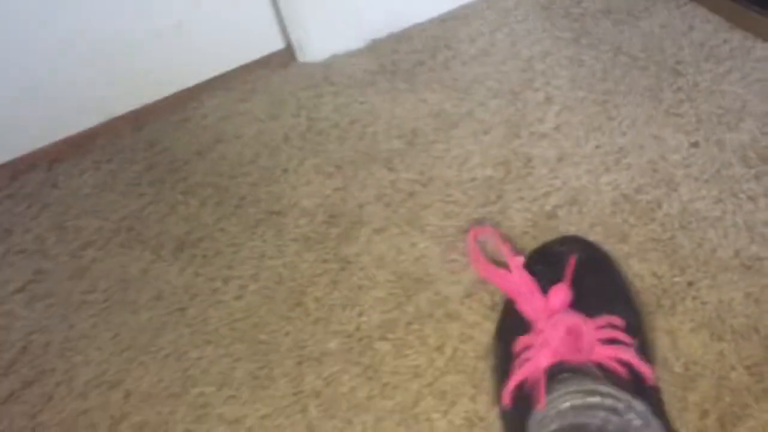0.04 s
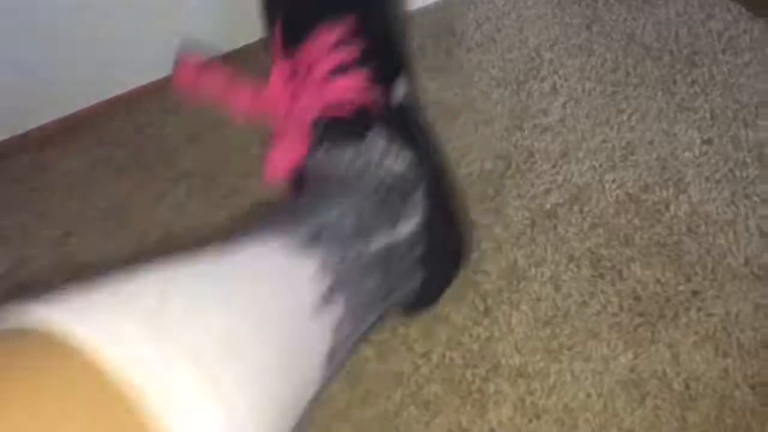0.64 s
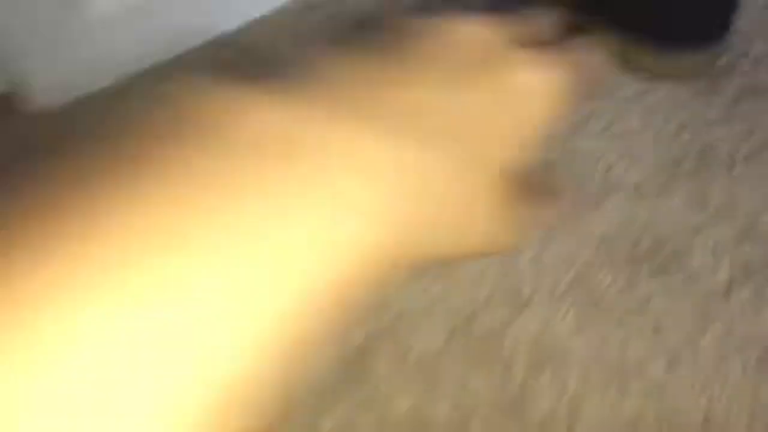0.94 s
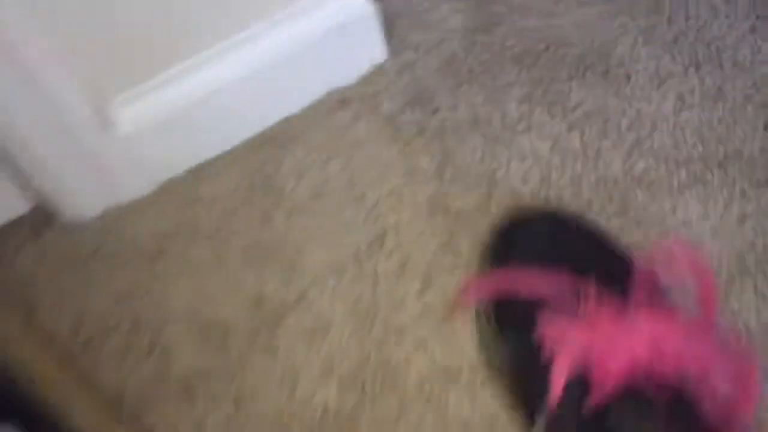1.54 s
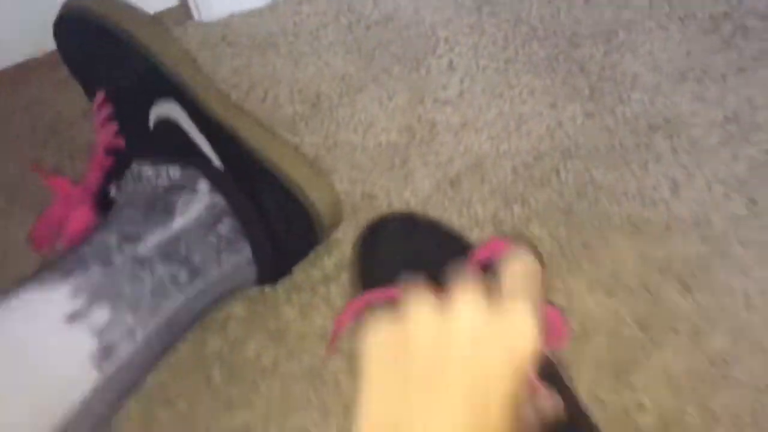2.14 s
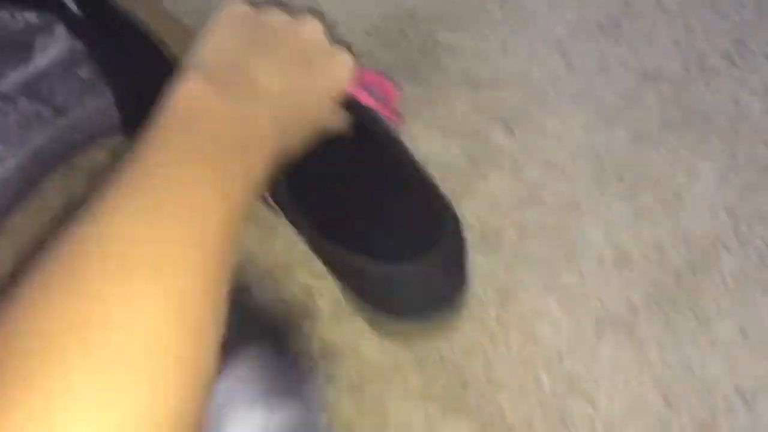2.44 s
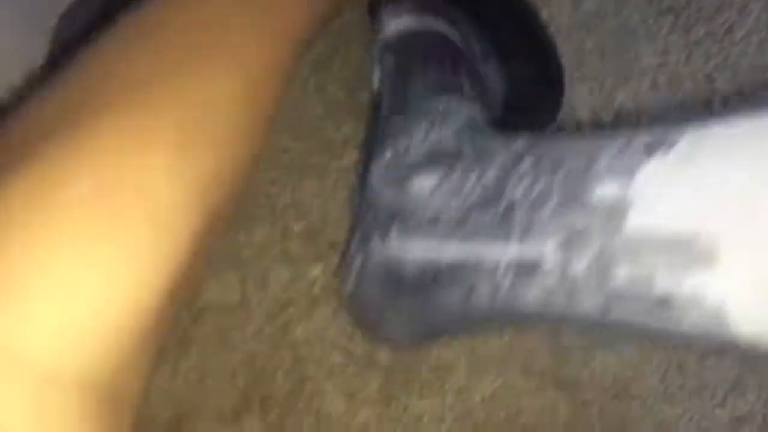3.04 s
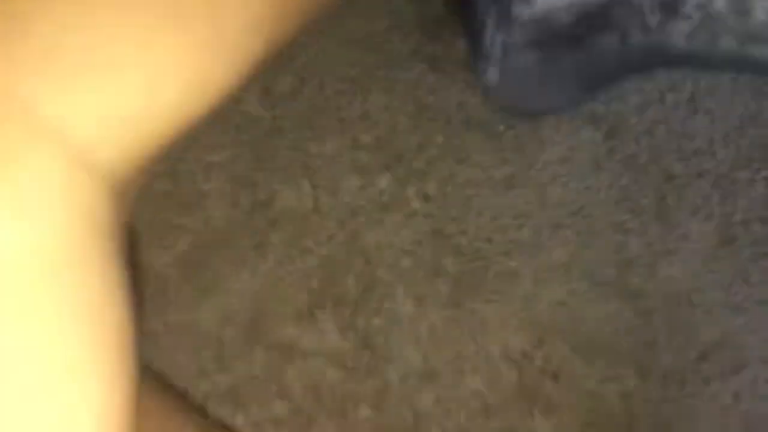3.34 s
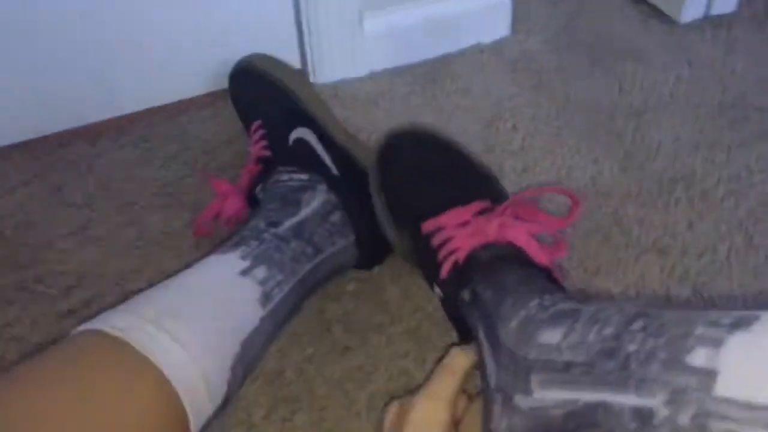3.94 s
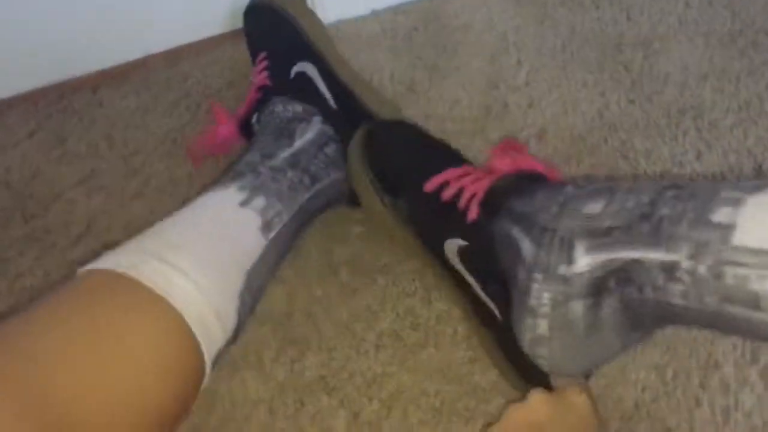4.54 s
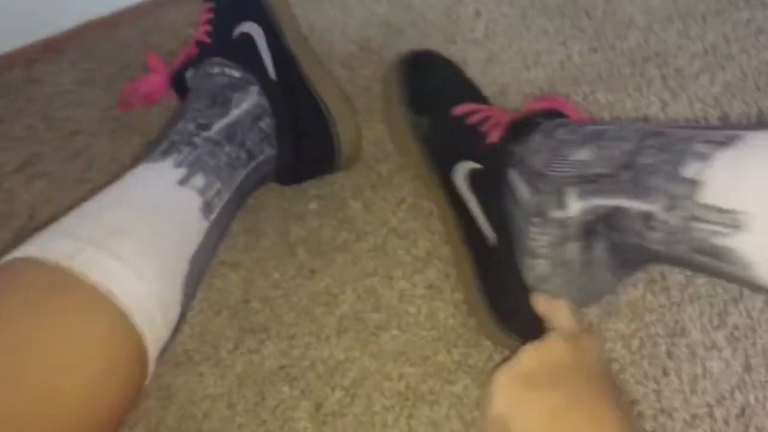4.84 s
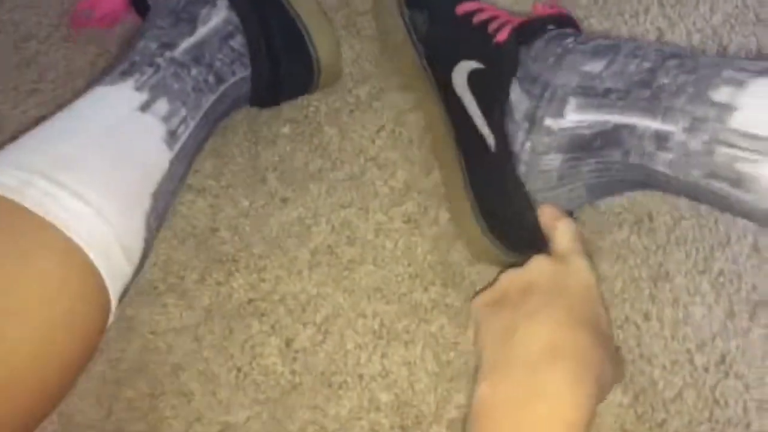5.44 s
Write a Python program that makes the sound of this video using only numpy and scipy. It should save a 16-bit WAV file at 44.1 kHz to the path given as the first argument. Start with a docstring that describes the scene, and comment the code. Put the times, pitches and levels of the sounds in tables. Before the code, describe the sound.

A heel thumps dully on carpet, then a socked foot is worked into a sneaker with soft, close scuffs and clicks.

```python
"""A faint squeak and a rub as a foot settles in a sneaker, then its heel lands with a dull thump.
Someone sits on the carpet of a quiet room, close to the microphone, pulling on shoes.
The second shoe is dragged over the pile and a socked foot is worked into it: fibres catch
and let go, lace tips and canvas tick, foot and shoe knock softly on the floor.
The carpet swallows the echoes; only a low rumble and a thin hiss lie behind."""
import sys
import numpy as np
from scipy import signal
from scipy.fft import rfft, irfft
from scipy.io import wavfile
from scipy.ndimage import uniform_filter1d

SR = 44100
rng = np.random.default_rng(int(sys.argv[2]) if len(sys.argv) > 2 else 0)


def to_wav(sig):
    """Store sig (one row per channel, or 1-D mono) as 16-bit WAV at the path in sys.argv[1].

    Samples outside -1..1 are clipped; the rate is SR.
    """
    pcm = np.clip(np.atleast_2d(sig), -1, 1) * 32767
    pcm = np.round(pcm).astype(np.int16)
    wavfile.write(sys.argv[1], SR, pcm.T)  # frames by channels


N = 250461

# Strokes of foot and shoe, each with its own loudness and brightness. The first foot settles and lifts;
# the second shoe is dragged from 1.1 s, held open from 2.7 s and pulled on from 4 s.
# (time at full speed [s], hold [s], rise [s], fall [s], relative levels of pile, cloth and hollow [dB],
#  tilt of pile and hollow [dB/octave], tilt of cloth [dB/octave])
STROKES = [ (0.0, 0.0058, .01, 0.03, -51.5, -56.5, -60, 2, -1),
           (0.04, 0.065, .05, 0.27, -65.5, -77.5, -66, 3, -1),
           (0.302, 0.037, 0.052, 0.058, -62, -71.5, -57, 4.5, -4),
           (0.49, 0.028, 0.027, 0.084, -69.5, -68.5, -80, 1, -2),
           (.667, .013, 0.0058, 0.017, -58.5, -61.5, -65, 0, -1.5),
           (0.783, 0.15, 0.3, 0.29, -67.5, -74.5, -71, 2.5, -1.5),
           (1.1, 0.014, 0.0097, 0.094, -63, -75.5, -69, -1.5, -6),
           (1.191, 0.01, 0.0086, .016, -54.5, -64.5, -49.5, 0, 0),
           (1.222, 0.007, 0.0092, 0.027, -55.5, -68.5, -68, -1.5, -7),
           (1.319, 0.011, 0.041, 0.028, -54, -67, -60, -2, -3.5),
           (1.388, 0.014, 0.023, .018, -55.5, -71, -58, -1, -4.5),
           (1.486, 0.22, 0.012, 0.064, -53.5, -68.5, -61, -3, -6.5),
           (1.748, 0.059, .06, 0.042, -50.5, -67.5, -58, -0.5, -3),
           (1.79, .04, 0.037, .025, -63, -64, -72, 2, 5),
           (1.871, 0.015, .012, 0.0077, -68.5, -60.5, -69, -3, 3),
           (1.977, 0.025, .014, 0.058, -64.5, -67, -57.5, -3.5, -3.5),
           (2.139, 0.0072, 0.015, 0.021, -56, -73, -55, -3.5, -6),
           (2.268, .07, 0.14, 0.15, -52, -62.5, -54.5, 1.5, -5.5),
           (2.497, 0.016, .03, 0.03, -75, -69, -54.5, 1.5, -4.5),
           (2.727, 0.039, 0.022, 0.0096, -66.5, -66, -70.5, 0, 0.5),
           (2.792, 0.016, 0.0085, 0.025, -66, -57.5, -75, -3, 1),
           (2.868, 0.017, .025, 0.013, -68, -61, -62, -1, 1),
           (3.008, 0.042, 0.14, .03, -72, -65, -67, -5, 0.5),
           (3.087, 0.042, 0.027, 0.031, -64.5, -58.5, -58.5, 1, -1),
           (3.188, 0.052, .03, .05, -72, -62, -62, -1, -2),
           (3.271, 0.048, .07, 0.041, -61.5, -57, -54.5, 6.5, -1),
           (3.368, 0.1, .03, 0.17, -73, -70, -80, -3.5, -0.5),
           (3.564, 0.035, 0.021, 0.045, -71, -63, -58, 4, .5),
           (3.662, 0.0058, .004, 0.021, -62.5, -64, -56, -3, -4),
           (3.709, 0.014, 0.057, 0.055, -71, -63.5, -71, -3, 2),
           (3.901, 0.011, 0.074, 0.029, -69, -69.5, -63, -2, 4),
           (4.045, 0.03, .01, .02, -90, -69.5, -79, -4, 5),
           (4.116, 0.031, .02, 0.041, -75, -66, -63.5, -5, -2),
           (4.193, 0.081, .06, 0.089, -65.5, -59, -67, -2, 2.5),
           (4.307, .015, 0.027, .015, -59, -71, -55.5, 0, 0),
           (4.409, 0.026, 0.066, 0.02, -63.5, -56, -53, 2.5, -2),
           (4.485, 0.024, 0.036, 0.1, -63.5, -63, -55.5, 4, -2),
           (4.62, 0.052, 0.052, .05, -60.5, -66, -67, 3, -4),
           (4.732, 0.028, 0.046, 0.05, -55.5, -54.5, -47.5, 3, -1),
           (4.898, .12, 0.057, .05, -70.5, -75, -76, -2, -1),
           (5.068, 0.066, 0.038, 0.063, -68, -65, -56, -4, -2),
           (5.212, 0.033, 0.033, .05, -71, -78, -65, -3, -9),
           (5.355, 0.016, 0.036, 0.03, -57, -75, -60, 1.5, -6),
           (5.487, 0.045, 0.078, 0.049, -53, -53, -48, 1, -2),
           (5.651, .01, .03, .03, -66.5, -69.5, -73, -2, 2), ]


def rubbing():
    """Close up, the sole rubs the carpet pile, cloth rubs canvas, and both stir the shoe's hollow."""
    # Colours of the three sounds: (frequency [Hz], relative level [dB])
    pile_colour = [(100, -26.5), (200, -0.5), (330, -13.5), (520, 3), (680, 0.5), (950, -0.5), (1250, -0.5),
                   (1800, -6), (2300, -11), (3000, -15.5), (4200, -15), (5200, -29), (9000, -33),
                   (16000, -54)]
    canvas_colour = [(500, -9.5), (1500, -3.5), (2300, 2.5), (2900, -1.5), (4000, 2), (4950, -1), (5600, 2),
                     (6600, 1), (7600, -1.5), (9600, -0.5), (10400, -7.5), (11500, -3), (14000, -7.5),
                     (16000, -7.5)]
    hollow_colour = [(100, -31), (190, -13), (290, -2.5), (400, 0), (500, -4.5), (620, -11), (900, -17),
                     (2000, -43)]
    pile_db, cloth_db, hollow_db, pile_tilt, cloth_tilt = np.transpose(STROKES)[4:]
    pile = friction(pile_colour, pile_db, pile_tilt, pivot_hz=1200, catches_per_s=1700,
                    spread_db=2.0, grain=0.6, patchy_db=2, ripple_db=2.0)
    cloth = friction(canvas_colour, cloth_db, cloth_tilt, pivot_hz=7500, catches_per_s=1100,
                     spread_db=2.5, grain=0.55, patchy_db=2.5, ripple_db=1.14)
    hollow = friction(hollow_colour, hollow_db, pile_tilt, pivot_hz=400, catches_per_s=460,
                      spread_db=1.0, grain=0.413, patchy_db=3.5, ripple_db=2.5)
    return gain_of(0.5) * pile + gain_of(1.5) * cloth + gain_of(-1.5) * hollow


def friction(colour, stroke_db, stroke_tilt, pivot_hz, catches_per_s,
             spread_db, grain, patchy_db, ripple_db):
    """Fibres catch and let go over a smooth hiss; the colour drifts as the contact moves."""
    # overlapping strokes add in power; the stronger one sets the brightness
    powers = np.square([gain_of(db) * movement(*row[:4]) for row, db in zip(STROKES, stroke_db)])
    total_power = powers.sum(0)
    tilt_db = stroke_tilt @ powers / total_power
    sizes = gain_of(spread_db * np.minimum(rng.exponential(1, N), 3)) * rng.choice([-1, 1], N)
    catches = unit_rms(sizes * (rng.random(N) < catches_per_s / SR))
    hiss = coloured(grain * catches + rng.standard_normal(N), colour)
    hz, frames, spectra = signal.stft(hiss, SR, nperseg=1024, noverlap=768)
    octaves = np.log2(np.clip(hz / pivot_hz, 0.2, 4))
    brightness = gain_of(octaves[:, None] * stretched(tilt_db, len(frames)))
    # brief patches from the moving contact; lasting ripples from reflections off leg and floor
    patches = patchy_db * blotches(spectra.shape, bins=5, frames=6)
    ripples = ripple_db * blotches(spectra.shape, bins=3, frames=45)
    drift = unit_rms(gain_of(patches + ripples))
    rub = signal.istft(spectra * brightness * drift, nperseg=1024, noverlap=768)[1]
    return stretched(np.sqrt(total_power), N) * rub[:N]


def heel():
    """The heel lands near the microphone: a tick of rubber, the sole's slap, the padded floor's thud."""
    # Sole and floor sound lower as they give:
    # (time [s], first pitch [Hz], last pitch [Hz], glide [s], peak [dB], swell [s], compactness)
    vibrations = [(.7489, 3460, 2400, 0.0012, -30.5, 0.00019, 1),
                  (.7494, 1125, 217, 0.00068, -9.5, 0.0012, 0.83),
                  (.7499, 1160, 329, .0022, -26, 0.0035, 1.6),
                  (.7506, 124.6, 40.95, .017, -5.5, 0.012, 2.54)]
    out = np.zeros(N)
    for start, *vibration in vibrations:
        add(out, start, damped_pulse(*vibration))
    # the pile crunches briefly as it is crushed
    t = np.arange(SR // 20) / SR
    crunch = gain_of(-39.5) * rng.standard_normal(len(t)) * np.exp(-t / 0.0028)
    add(out, vibrations[0][0], crunch)
    return lowpass(out, edge_hz=4800, order=10)


def damped_pulse(first_hz, last_hz, glide_s, db, swell_s, compactness):
    """A heavily damped vibration that swells, sags in pitch and dies."""
    t = np.arange(SR // 4) / SR
    hz = last_hz + (first_hz - last_hz) * np.exp(-t / glide_s)
    envelope = (t / swell_s * np.exp(1 - t / swell_s)) ** compactness
    return -gain_of(db) * envelope * np.sin(2 * np.pi * np.cumsum(hz) / SR)


def air_rush_and_knocks():
    """A low rush of air ahead of the landing heel, then soft knocks of foot and shoe on the floor."""
    # Two pulses of air, then the knocks: (time [s], nominal pitch [Hz], peak [dB], swell [s])
    pulses = [(0.665, 64, -31.5, 0.02), (.702, 49.3, -31, 0.022), (1.1963, 486, -39, 0.003),
              (1.579, 197, -48.5, 0.011), (2.135, 400, -52.5, 0.0065), (2.465, 64, -51, 0.023),
              (2.836, 333, -48, 0.0043), (2.839, 85, -40.5, 0.017), (2.887, 70, -42, 0.018),
              (3.544, 294, -53, 0.0076), (4.480, 277.5, -49, 0.0086), (4.536, 87, -51, 0.03),
              (4.746, 249, -49.5, 0.011), (5.135, 65, -47, 0.013)]
    out = np.zeros(N)
    for start, hz, db, swell_s in pulses:
        add(out, start, damped_pulse(1.4 * hz, 0.81 * hz, swell_s, db, swell_s, compactness=2.14))
    return out


def ticks():
    """Lace tips and canvas snap: one sharp release with a short scatter, in one broad resonance."""
    # Snaps: (time [s], peak [dB], ring [Hz], treble share [dB], treble edge [Hz])
    snaps = [(0.294, -40, 4500, -10, 10100), (1.1035, -46.5, 6200, -8, 9000),
             (1.192, -35.5, 8000, 12, 16100), (1.1974, -38.5, 2000, -9, 14000),
             (1.2222, -45, 1600, -7, 7000), (1.471, -51, 1200, -9, 5000), (1.854, -38.5, 6300, -14, 15000),
             (1.883, -52, 11000, -3, 16100), (3.5598, -47, 1000, -10, 2200), (3.6635, -54, 1300, -13, 4000),
             (4.038, -41.5, 2590, 11, 11000), (4.064, -54, 7500, -8, 13000),
             (4.0825, -54, 7500, -14, 10000), (4.1054, -44.5, 5000, 6, 15000),
             (4.3178, -33.5, 2040, -3, 7500), (4.4118, -32.5, 2240, -18, 3930),
             (4.596, -43.5, 5430, -9, 12000)]
    out = np.zeros(N)
    t = np.arange(SR // 20) / SR
    for start, db, hz, treble_db, edge_hz in snaps:
        scatter = rng.standard_normal(len(t)) * (np.exp(-t / 0.00069) + 0.22 * np.exp(-t / 0.0036))
        crack = scatter + 6 * (t == 0)
        ring = signal.lfilter(*signal.iirpeak(hz, Q=1.4, fs=SR), crack)
        snap = lowpass(unit_rms(ring) + gain_of(treble_db) * unit_rms(crack), edge_hz, order=4)
        add(out, start, gain_of(db) * snap / abs(snap).max())
    return out


def squeaks():
    """Rubber sticks and slips, exciting one narrow resonance for a moment."""
    # Slips: (middle time [s], pitch [Hz], bandwidth [Hz], level [dB], length [s])
    slips = [(0.009, 600, 54, -49, 0.03), (.010, 1680, 120, -49.5, 0.021), (1.33, 1100, 400, -68, 0.034),
             (3.905, 960, 250, -65, 0.017), (4.304, 1200, 81, -55, 0.02)]
    out = np.zeros(N)
    for middle, hz, width_hz, db, length in slips:
        ring = signal.lfilter(*signal.iirpeak(hz, Q=hz / width_hz, fs=SR), rng.standard_normal(SR // 4))
        fade = signal.windows.hann(round(length * SR))
        add(out, max(middle - length / 2, 0), gain_of(db) * unit_rms(ring[-len(fade):]) * fade)
    return out


def shifting_legs():
    """The boards under the carpet rumble as the legs shift their weight."""
    # Shifts of weight: (time [s], hold [s], level [dB])
    shifts = [(0, 0.18, -57.5), (0.224, 0.63, -58.5), (0.824, 0.042, -55), (1.185, .02, -61),
              (1.518, .22, -58), (1.988, 0.31, -63), (2.452, 0.064, -55.5), (2.654, 0.21, -64),
              (3.08, 0.13, -64), (3.732, .02, -63.5), (4.18, 0.25, -63.5), (4.46, 0.13, -60.5),
              (4.73, 0.077, -55), (4.915, 0.34, -65), (5.353, 0.24, -60)]
    # Colour of the floorboards: (frequency [Hz], relative level [dB])
    board_colour = [(15, -30), (35, -11.5), (55, 4.5), (80, -0.5), (120, -6.5), (170, -14.5), (260, -14),
                    (600, -55), (2000, -76)]
    swells = [gain_of(db) * movement(start, hold, rise_s=0.04, fall_s=0.071) for start, hold, db in shifts]
    weight = np.linalg.norm(swells, axis=0)
    return stretched(weight, N) * coloured(rng.standard_normal(N), board_colour)


def room_tone():
    """The low rumble and thin hiss of a quiet room, behind everything."""
    # Colour of the room: (frequency [Hz], relative level [dB])
    room_colour = [(12, -39), (20, -14.5), (130, -8), (158, -15.5), (192, -30), (754, -27), (866, -23),
                   (1110, -31.5), (3220, -31.5), (4890, -36.5), (6470, -33.5), (10100, -40.5),
                   (15800, -39.5)]
    return gain_of(-66.5) * coloured(rng.standard_normal(N), room_colour)


def movement(start, hold_s, rise_s, fall_s):
    """Gain of one movement over the scene: 10 dB down one rise before its hold or one fall after."""
    t = np.arange(0, N, 32) / SR
    away = np.maximum(start - t, 0) / rise_s + np.maximum(t - start - hold_s, 0) / fall_s
    return gain_of(-10 * np.minimum(away, 10))


def blotches(shape, bins, frames):
    """A smooth random field over frequency and time."""
    field = uniform_filter1d(rng.standard_normal(shape), size=bins, axis=0)
    return unit_rms(uniform_filter1d(field, size=frames, axis=1))


def coloured(x, colour):
    """Shapes x with a (frequency, level) curve, at an rms of one."""
    hz, db = np.transpose(colour)
    bin_db = np.interp(np.log(np.fft.rfftfreq(N, 1 / SR) + 1), np.log(hz + 1), db)
    return unit_rms(irfft(rfft(x) * gain_of(bin_db), N))


def lowpass(x, edge_hz, order):
    """Soft materials take the treble off a blow."""
    return signal.sosfilt(signal.butter(order, edge_hz, fs=SR, output="sos"), x)


def stretched(curve, count):
    """Reads a control curve that spans the whole scene at count even steps."""
    return np.interp(np.linspace(0, 1, count), np.linspace(0, 1, len(curve)), curve)


def gain_of(db):
    """Decibels to amplitude."""
    return 10 ** (np.asarray(db) / 20)


def unit_rms(x):
    """Scales to an rms of one."""
    return x / np.sqrt(np.mean(x ** 2) + 1e-20)


def add(mix, start, sound):
    """Lays a sound into the mix at start seconds."""
    part = mix[round(start * SR):][:len(sound)]
    part += sound[:len(part)]


def scene():
    """All sources at one close microphone, dry: the carpet swallows the echoes."""
    shoes = rubbing() + heel() + air_rush_and_knocks() + ticks() + squeaks()
    return (shoes + shifting_legs() + room_tone())[None]


def record(dry):
    """The recorder's band limit cuts the highest treble steeply."""
    taps = signal.firwin(801, cutoff=15800, window=("kaiser", 9), fs=SR)
    return signal.oaconvolve(dry, taps[None], "same")


dry = scene()
out = record(dry)
to_wav(out)
```